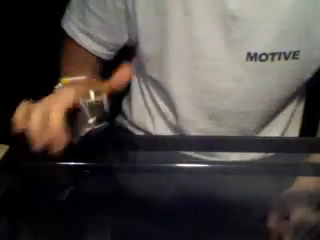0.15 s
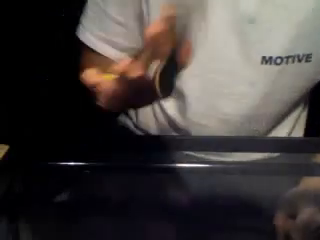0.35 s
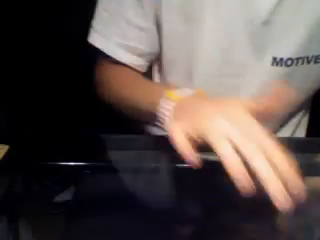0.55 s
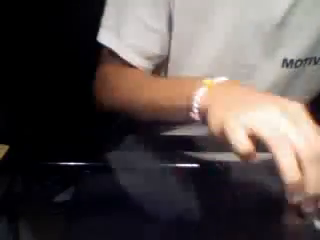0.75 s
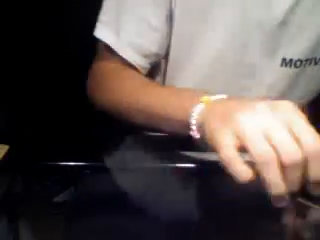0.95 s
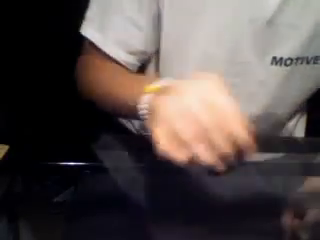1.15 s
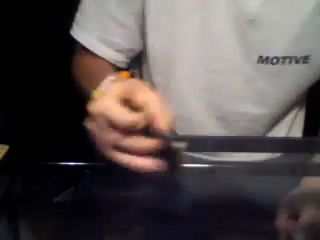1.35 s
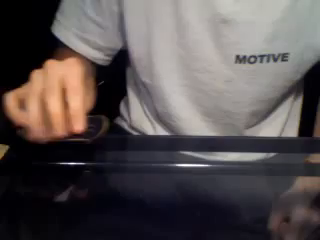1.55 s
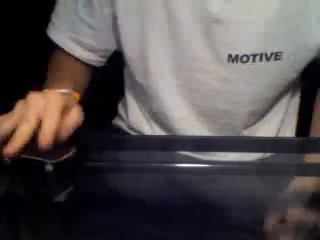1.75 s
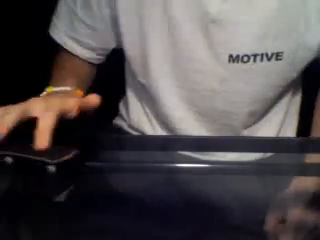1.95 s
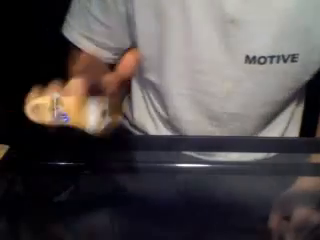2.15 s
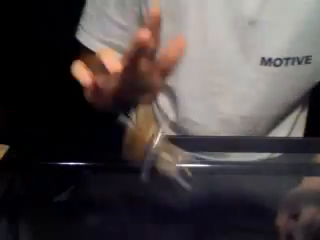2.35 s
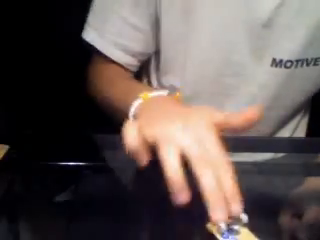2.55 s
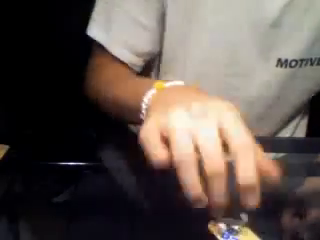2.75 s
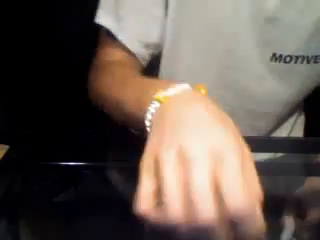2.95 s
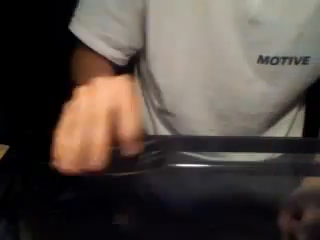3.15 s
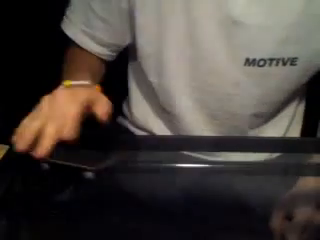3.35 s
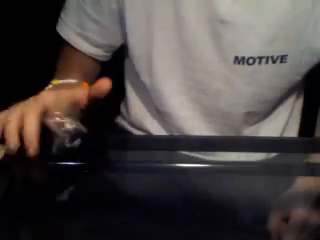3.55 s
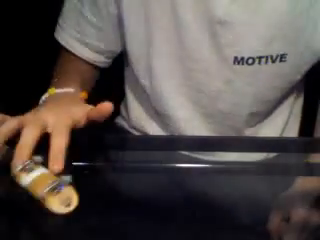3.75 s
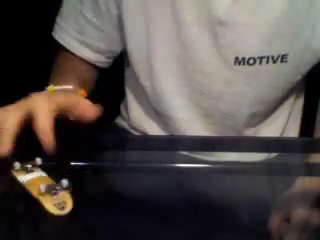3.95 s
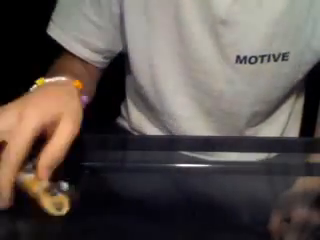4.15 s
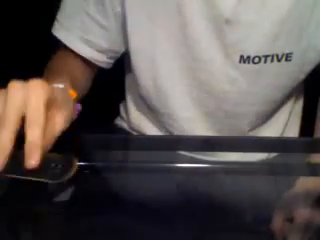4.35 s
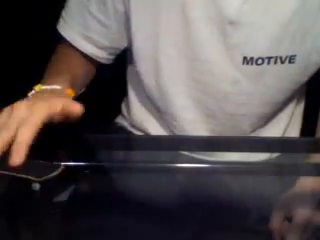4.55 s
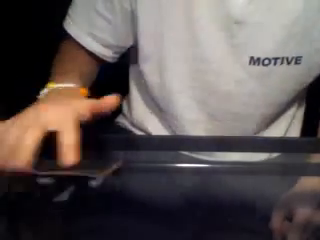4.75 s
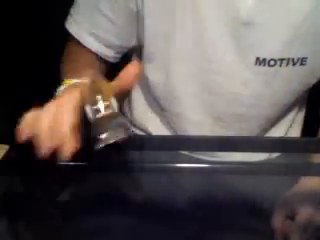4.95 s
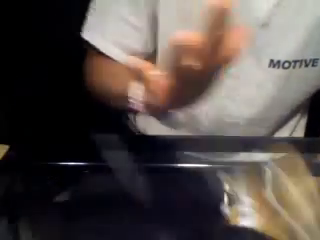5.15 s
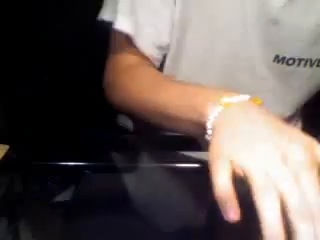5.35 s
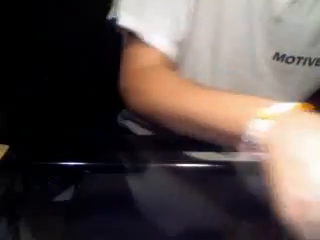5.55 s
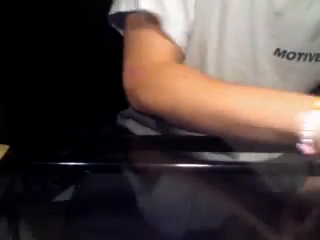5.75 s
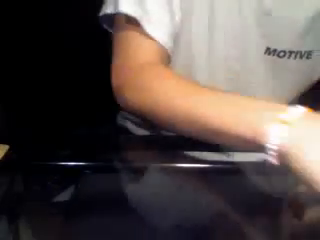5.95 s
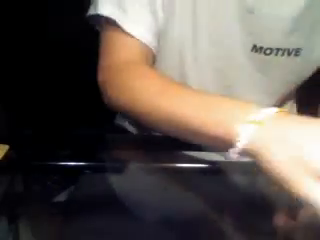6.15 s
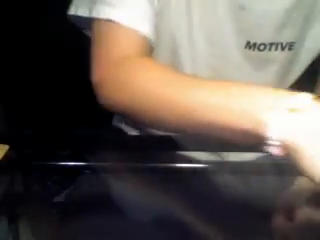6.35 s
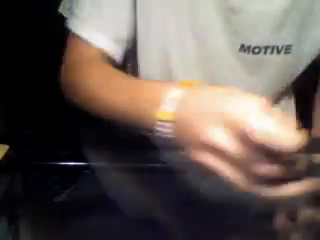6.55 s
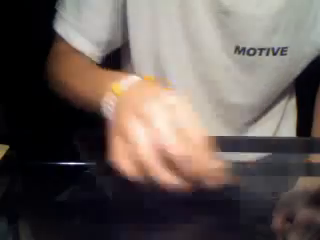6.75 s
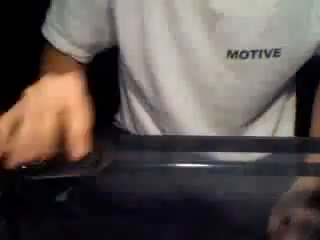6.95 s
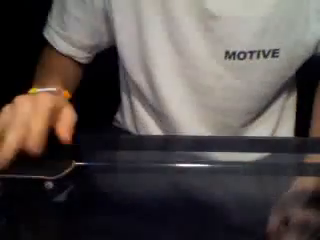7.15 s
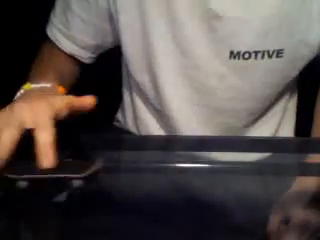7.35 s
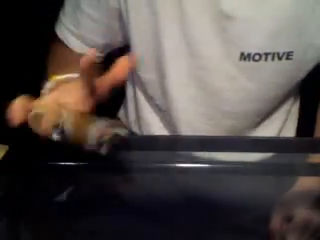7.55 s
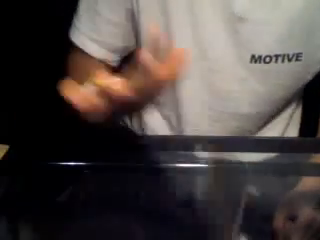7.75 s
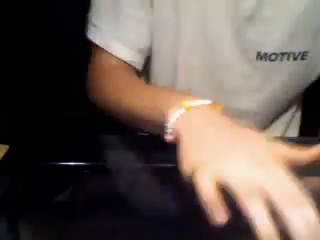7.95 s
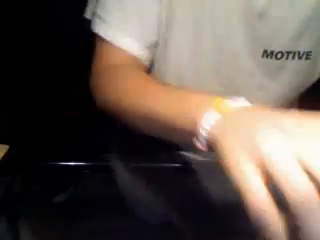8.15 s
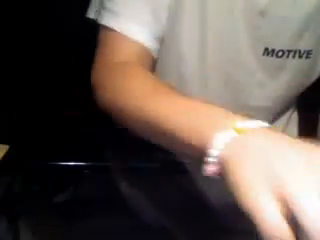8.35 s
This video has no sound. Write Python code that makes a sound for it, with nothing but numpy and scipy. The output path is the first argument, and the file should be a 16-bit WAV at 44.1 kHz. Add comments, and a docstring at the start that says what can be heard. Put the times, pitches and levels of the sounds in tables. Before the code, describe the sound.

A fingerboard does five tricks on a hard desk. Each begins with a light snap of the tail, usually after a faint roll, then a brief gap and a burst of sharp, ringing clacks as the deck and metal trucks land. The desk answers with short low hums. Lighter taps and soft hand rubs fall between tricks. It is heard close to a small microphone in a quiet room, over hiss and a thin electronic whine.

```python
"""A fingerboard clatters on a hard desk: deck and metal trucks land in bursts of ringing clacks. The tail
scuffs and is popped, the tiny wheels roll and whirr, and fingers slam the board flat. The desk answers each
blow with a short low hum, and a hand rubs softly on it. Heard close to a small microphone in a quiet room, over
hiss and a thin electronic whine."""
import sys
import numpy as np
from scipy import signal
from scipy.fft import rfft, irfft
from scipy.io import wavfile

SR = 44100
rng = np.random.default_rng(int(sys.argv[2]) if len(sys.argv) > 2 else 0)


def generate_wav(sig):
    """Save sig (samples, or channels by samples) to the path in sys.argv[1] as 16-bit PCM at SR."""
    pcm = np.round(np.clip(np.atleast_2d(sig).T, -1, 1) * 32767).astype(np.int16)
    wavfile.write(sys.argv[1], SR, pcm)


N = 369999
BLOW_S = 0.25
CONTACT_BANDS_HZ = [(500, 1800), (1800, 4500), (4500, 12000)]   # knock, clack, tick


# landings, bright on bare metal, dull on soft wheels:
# start_s, level_db, brightness_db, thump_db, rattle_t60_s, deck_hz, truck_hz
LANDINGS = [(0.5452, -22.5, -1.5, -33, 0.029, 1410, 3340), (0.565, -21.5, 1, -36, 0.046, 1250, 3360),
            (0.5859, -37, 2, -36, 0.04, 1110, 8250), (0.598, -30, 5.5, -37.5, 0.0098, 1110, 5150),
            (0.6271, -30.5, 3, -37, 0.043, 1260, 4040), (0.7792, -53, -11, -67, 0.032, 980, 2710),
            (0.9629, -35.5, -0.5, -41.5, 0.057, 1010, 4330), (1.3427, -43.5, -17.5, -57, 0.038, 1280, 2260),
            (1.4255, -26.5, -3, -42.5, 0.033, 1140, 2670), (1.4357, -30.5, -4.5, -44.5, 0.032, 1680, 2180),
            (1.6743, -39, -1, -58, 0.032, 1780, 4060), (1.705, -35.5, 1, -51.5, 0.033, 1020, 3600),
            (2.416, -23.5, 0.5, -32.5, 0.048, 720, 5350), (2.5106, -28, 7.5, -41, 0.026, 860, 8100),
            (2.5183, -29.5, 3.5, -29, 0.033, 790, 7700), (2.9694, -49, -6, -55.5, 0.034, 1360, 2750),
            (3.0007, -39, 3, -54, 0.028, 1140, 2980), (3.2055, -41.5, -2, -51.5, 0.038, 1000, 7050),
            (3.225, -44, -4, -61, 0.063, 1180, 8500), (3.2636, -35, -1.5, -57.5, .036, 760, 3900),
            (3.4337, -56.5, -12, -63, 0.052, 625, 3360), (3.729, -27, 0, -49, 0.033, 1295, 2600),
            (4.221, -53.5, -16, -74, .024, 805, 3060), (4.2515, -34, 2.5, -56.5, 0.029, 947, 7400),
            (4.3862, -43.5, -0.5, -59, 0.046, 980, 7140), (4.4385, -33, -1.5, -50, 0.028, 950, 7400),
            (4.5872, -56.5, -14, -65, 0.043, 665, 3190), (5.1542, -32, 6, -34.5, 0.012, 1120, 5700),
            (5.1751, -25.5, -0.5, -30, 0.032, 1080, 5840), (5.1859, -28.5, 5.5, -54, 0.014, 960, 5670),
            (5.247, -24.5, 0, -32, 0.034, 870, 2950), (5.261, -34.5, 1, -42.5, 0.044, 1970, 5070),
            (5.3276, -39, -2.5, -47, 0.042, 1280, 2680), (5.404, -39, -19.5, -43, 0.043, 1860, 2900),
            (5.4503, -44.5, 5.5, -51.5, 0.031, 1320, 6200), (5.5287, -43, -11.5, -50, 0.022, 1840, 2810),
            (6.3751, -48.5, -8, -57, .017, 1890, 2900), (6.4001, -38, -10, -44, 0.021, 1870, 2370),
            (6.6742, -34, -19, -43, 0.017, 1240, 3140), (6.7566, -22.5, 0.5, -39, 0.022, 835, 2750),
            (7.012, -37, -8, -55, 0.013, 1890, 2640), (7.0228, -39, 0.5, -59, 0.04, 820, 6920),
            (7.053, -36, -1.5, -52.5, 0.041, 1210, 5470), (7.7999, -26.5, -4, -38.5, 0.034, 1350, 2270),
            (7.8176, -22.5, -1, -36.5, 0.025, 1430, 3080), (7.8883, -36, 1.5, -36.5, 0.028, 910, 3200),
            (7.8997, -35.5, 2.5, -41, 0.042, 1700, 3620), (7.9704, -36, -0.5, -42, .022, 734, 6000),
            (7.9847, -39, -0.5, -55, 0.069, 1950, 8050), (8.0487, -36, -9, -49.5, 0.016, 774, 5000),
            (8.3119, -32, 0, -39, 0.049, 1390, 7240)]
# loose board bouncing edge to edge: start_s, end_s, gap_s, level_db, deck_hz
TUMBLES = [(3.755, 3.87, .029, -35.5, 800), (5.364, 5.43, .02, -40.5, 1540)]


def board_hits(tumble_loss_db=14, jitter_s=0.0015, uneven_db=1.5, knock_db=-3.5, knock_loss_per_db=0.438):
    """List the landings and fading bounces; a brighter blow has less wooden knock."""
    rows = list(LANDINGS)
    bounce_bright_db, bounce_thump_db, bounce_t60_s, bounce_truck_hz = -2.5, -8.5, 0.034, 3240
    for start, end, gap, db, deck_hz in TUMBLES:
        for s in np.arange(start, end, gap):
            late, stronger = rng.standard_normal(2)
            level = db - tumble_loss_db * (s - start) / (end - start) + uneven_db * stronger
            rows.append((s + jitter_s * late, level, bounce_bright_db, level + bounce_thump_db,
                         bounce_t60_s, deck_hz, bounce_truck_hz))
    hits = []
    for s, db, bright_db, thump_db, t60_s, deck_hz, truck_hz in rows:
        bands_db = (db + knock_db - knock_loss_per_db * bright_db, db, db + bright_db)
        hits.append((s, bands_db, thump_db, t60_s, deck_hz, truck_hz))
    return hits


# board resonances on landing: pitch_hz, width_hz, gain_db
BOARD_MODES = [(980, 64, -4), (1299, 240, -5), (1857, 75, -6), (2417, 67, -2.5), (3230, 790, 4.5),
               (4050, 135, -4), (4700, 230, -17.5), (5500, 2100, -1.5), (6420, 650, -5), (7800, 1560, -5)]


def clatter(hits, deck_width_hz=260, deck_db=4.0, truck_db=8.0):
    """The board lands and tumbles; deck and trucks ring differently with each grip and angle."""
    out = np.zeros(N)
    for s, bands_db, thump_db, t60_s, deck_hz, truck_hz in hits:
        modes = BOARD_MODES + [(deck_hz, deck_width_hz, deck_db), (truck_hz, truck_hz / 4, truck_db)]
        blow = contact(bands_db, t60_s, modes, crack_db=5.5, crack_t60_s=0.0033, dry_db=-6, grain_db=4.5)
        add(out, s, blow)
        add(out, s, desk_hum(thump_db))
    return out


def contact(bands_db, t60_s, modes, crack_db, crack_t60_s, dry_db, grain_db, uneven_db=2.0):
    """One hard crack, then loose wheels and trucks rattle; both ring the board."""
    t = times(BLOW_S / 2)
    n = len(t)
    grains = rng.standard_normal(n) * from_db(grain_db * np.repeat(rng.standard_normal(n), 20)[:n])
    build_s = 0.036 * t60_s
    rattle = grains * (1 - np.exp(-t / build_s)) * from_db(-60 * t / t60_s)
    crack = rng.standard_normal(n) * from_db(crack_db - 60 * t / crack_t60_s)
    force = rattle + crack + 1e-18
    rings = sum(from_db(db + uneven_db * rng.normal()) * resonate(force, hz, width_hz)
                for hz, width_hz, db in modes)
    sound = from_db(dry_db) * force + rings
    return sum(at_level(band(sound, *edges), db) for edges, db in zip(CONTACT_BANDS_HZ, bands_db))


def lead_ins(hits, lead_s=0.0066, gain_db=-9.0):
    """A faint hiss swells for a few milliseconds before each clack."""
    t = times(lead_s)
    out = np.zeros(N)
    for s, bands_db, *_ in hits:
        hiss = sum(from_db(db) * band_noise(len(t), *edges)
                   for edges, db in zip(CONTACT_BANDS_HZ, bands_db))
        add(out, s - lead_s, hiss * from_db(gain_db) * np.sqrt(t / lead_s))
    return out


# tail snaps: start_s, level_db, thump_db, rattle_t60_s
POPS = [(0.165, -40.5, -46, .036), (2.1282, -39.5, -43, 0.026), (3.584, -43.5, -52, 0.012),
        (4.8449, -41, -50, 0.04), (7.5154, -41.5, -46.5, 0.033)]
# board resonances in a pop: pitch_hz, width_hz, gain_db
POP_MODES = [(435, 30, 14.5), (628.5, 73, 6), (860, 74, 0.5), (1360, 310, 1), (1650, 120, -9.5),
             (3390, 390, 0.5), (6800, 450, -12), (8200, 1500, -8)]
LOOSE_POP_T60_S = 0.046


def pops(truck_hz=5950, truck_width_hz=950, wave_db=-5.0):
    """The tail snaps against the desk; a crisper snap ticks louder and rings the trucks more."""
    out = np.zeros(N)
    for s, db, thump_db, t60_s in POPS:
        crispness = np.log2(LOOSE_POP_T60_S / t60_s)
        modes = POP_MODES + [(truck_hz, truck_width_hz, 5 + 2.5 * crispness)]
        bands_db = (db - 1, db, db + 5 + 4.5 * crispness)
        snap = contact(bands_db, t60_s, modes, crack_db=8, crack_t60_s=0.0055, dry_db=-18, grain_db=8)
        add(out, s, snap)
        add(out, s, desk_hum(thump_db) + bending_wave(thump_db + wave_db))
    return out


def tail_scuffs(lead_s=0.023, rise_db=18.0, end_db=-39.0):
    """Before each pop the fingers press the tail down and it scuffs the desk, ever harder."""
    t = times(lead_s)
    out = np.zeros(N)
    for s, *_ in POPS:
        scuff = band_noise(len(t), 520, 6500)
        add(out, s - lead_s, scuff * from_db(end_db - rise_db * (1 - t / lead_s)))
    return out


def wheel_spin(t60_s=0.26):
    """Airborne wheels whirr on their axles; a looser pop leaves more whirr."""
    t = times(BLOW_S)
    whirr = np.zeros(N)
    for s, db, _, rattle_t60_s in POPS:
        looseness = np.sqrt(rattle_t60_s / LOOSE_POP_T60_S)
        add(whirr, s, looseness * rng.standard_normal(len(t)) * from_db(db - 60 * t / t60_s))
    return from_db(-5) * resonate(whirr, 5850, 550) + from_db(8) * resonate(whirr, 8800, 1300)


# fingers slam the board flat: start_s, pulse_db, contact_s
SLAMS = [(0.597, -26, 0.00018), (2.419, -17.5, 0.00014), (2.5123, -26, 0.0011), (2.516, -28, 0.00066),
         (5.2488, -21.5, 0.00017), (6.7572, -7.5, 0.00015)]


def slams(flex_hz=640, flex_t60_s=0.008, flex_db=-5.0):
    """A slam pushes one pulse out of the desk, whose top flexes briefly."""
    t = times(BLOW_S)
    flex = np.sin(2 * np.pi * flex_hz * t) * from_db(flex_db - 60 * t / flex_t60_s)
    out = np.zeros(N)
    for s, db, contact_s in SLAMS:
        pulse = (2 * t / contact_s) * np.exp(1 - 2 * t / contact_s)
        add(out, s, -from_db(db) * (pulse + flex))
    return signal.sosfilt(signal.butter(1, 30, "high", fs=SR, output="sos"), out + 1e-18)


# desk top resonances: pitch_hz, gain_db, t60_s
DESK_MODES = [(113, -25, 0.071), (162, -17.5, 0.17), (203, -13.5, 0.1384), (261, -4, 0.056),
              (299.2, 3, 0.067), (343.7, 2, 0.1), (424, -2.5, 0.08)]


def desk_hum(level_db, uneven_db=4.5, shove_db=2.5, shove_t60_s=0.02):
    """A blow shoves the desk and rings its low modes; spot and resting hand vary level and pitch."""
    t = times(BLOW_S)
    detune = 1 + 0.05 * rng.standard_normal(len(DESK_MODES))
    hum = np.zeros(len(t))
    for k, (hz, db, t60_s) in enumerate(DESK_MODES):
        decay = from_db(db + uneven_db * rng.normal() - 60 * t / t60_s)
        hum += (-1) ** k * decay * np.sin(2 * np.pi * hz * detune[k] * t)
    shove = band_noise(len(t), 25, 535) * from_db(shove_db - 60 * t / shove_t60_s)
    return at_level(hum + shove, level_db)


def bending_wave(level_db, start_hz=620, end_hz=175, glide_s=0.00894, t60_s=0.13, build_s=0.0058):
    """High bending waves cross the desk faster than low ones, so the thump falls in pitch."""
    t = times(BLOW_S)
    hz = end_hz + (start_hz - end_hz) * np.exp(-t / glide_s)
    wave = np.sin(2 * np.pi * (np.cumsum(hz) / SR + rng.random()))
    return at_level(wave * (1 - np.exp(-t / build_s)) * from_db(-60 * t / t60_s), level_db)


# pushes along the desk: start_s, end_s, level_db
ROLLS = [(0.023, 0.16, -61.5), (0.712, 0.79, -56.5), (1.916, 2.146, -60), (4.6, 4.87, -57.5),
         (7.295, 7.526, -58.5)]
# rolling noise: freq_hz, relative_density_db
WHEEL_SPECTRUM = [(200, -34), (450, -15.5), (750, 4.5), (1000, 2), (1500, -10), (3500, -6), (9000, -36)]


def rolling(attack_s=0.063, release_s=0.015, rough_db=2.5):
    """Small wheels gather speed and murmur unevenly over the desk."""
    t = np.arange(N) / SR
    push = sum(from_db(db) * np.clip((t - start) / attack_s, 0, 1) * np.clip((end - t) / release_s, 0, 1)
               for start, end, db in ROLLS)
    wobble = band_noise(N, 14, 120)
    return shaped_noise(WHEEL_SPECTRUM) * push * from_db(rough_db * wobble)


# hand and wrist on the desk: start_s, level_db, length_s
RUBS = [(0.832, -58.5, 0.11), (2.87, -55, 0.035), (4.145, -58, .05), (5.845, -52.5, 0.052),
        (6.14, -62, 0.057), (6.28, -60, .05)]


def hand_rubs(hum_hz=320, width_hz=110):
    """Dragging skin wakes the desk's low hum without a click."""
    swell = np.zeros(N)
    for s, db, length_s in RUBS:
        add(swell, s, from_db(db) * np.hanning(int(length_s * SR)))
    friction = band_noise(N, 104, 390)
    return swell * rms_one(resonate(friction, hum_hz, width_hz))


# room decay: freq_hz, t60_s
ROOM_DECAY = [(150, 0.36), (400, 0.13), (1000, 0.2), (3000, 0.28), (7000, 0.27), (11000, 0.18)]
# room reflections: freq_hz, gain_db
ROOM_GAIN = [(150, -9.5), (400, -12.5), (1000, -9), (3000, -11.5), (5500, -10), (8500, -6.5), (11000, -4.5)]


def room(x, length_s=0.5, first_echo_s=0.0045, build_s=0.0022, patterns=7, changes_per_s=45):
    """Dense reflections die away band by band; their pattern shifts as the board moves about."""
    t = times(length_s)
    onset = np.clip((t - first_echo_s) / build_s, 0, 1)
    edges_hz = np.geomspace(80, 13000, 13)
    responses = np.zeros((patterns, len(t)))
    for low, high in zip(edges_hz, edges_hz[1:]):
        hz = np.sqrt(low * high)
        fade = onset * from_db(-60 * t / at_hz(ROOM_DECAY, hz))
        echoes = band(rng.standard_normal(responses.shape), low, high)
        responses += from_db(at_hz(ROOM_GAIN, hz)) * echoes * fade / np.sqrt(np.sum(fade ** 2))
    place = np.arange(N) / SR * changes_per_s
    out = np.zeros(N)
    for k, response in enumerate(responses):
        away = np.abs((place - k) % patterns - 1)
        crossfade = np.cos(np.minimum(away, 1) * np.pi / 2)   # equal power
        out += signal.oaconvolve(x * crossfade, response)[:N]
    return out


# hiss: freq_hz, relative_density_db
HISS_SPECTRUM = [(18, -45), (30, -35.5), (272, -7.5), (578, -20), (724, -11.5), (842, -14), (1320, -8.5),
                 (1420, -8), (2350, -12), (2540, -10), (3690, -11.5), (3980, -16.5), (4290, -15.5),
                 (9110, -28.5), (12000, -50), (15600, -85), (22000, -120)]
# electronic whine: pitch_hz, rms_db
WHINE_TONES = [(1299.5, -67.5), (2600, -73), (3898, -71)]


def background(hiss_db=-57.5):
    """Steady hiss with a thin electronic whine."""
    t = np.arange(N) / SR
    whine = sum(from_db(db) * np.sqrt(2) * np.sin(2 * np.pi * (hz * t + rng.random()))
                for hz, db in WHINE_TONES)
    return from_db(hiss_db) * shaped_noise(HISS_SPECTRUM) + whine


def times(length_s):
    """Sample times in seconds."""
    return np.arange(int(length_s * SR)) / SR


def from_db(db):
    """Decibels to gain."""
    return 10 ** (np.asarray(db) / 20)


def rms_one(x):
    """Scale to rms 1."""
    return x / np.sqrt(np.mean(x ** 2) + 1e-20)


def at_level(x, db, head_s=0.014, reference_s=0.01):
    """Scale a blow so its head holds the energy of reference_s at db rms."""
    head = x[:int(head_s * SR)]
    return x * from_db(db) / np.sqrt(np.sum(head ** 2) / (reference_s * SR) + 1e-20)


def at_hz(points, hz):
    """Read a table along a log-frequency axis."""
    freqs_hz, values = np.array(points).T
    return np.interp(np.log(hz), np.log(freqs_hz), values)


def band(x, low_hz, high_hz):
    """Steep causal band-pass."""
    return signal.sosfilt(signal.butter(4, [low_hz, high_hz], "band", fs=SR, output="sos"), x)


def band_noise(n, low_hz, high_hz):
    """Band-limited noise, rms 1."""
    return rms_one(band(rng.standard_normal(n), low_hz, high_hz))


def shaped_noise(spectrum):
    """Steady noise of a given colour, rms 1."""
    hz = np.maximum(np.fft.rfftfreq(N, 1 / SR), 1)
    return rms_one(irfft(rfft(rng.standard_normal(N)) * from_db(at_hz(spectrum, hz)), N))


def resonate(x, hz, width_hz):
    """Two-pole resonance, peak gain 1."""
    r = np.exp(-np.pi * width_hz / SR)
    feedback = [1, -2 * r * np.cos(2 * np.pi * hz / SR), r * r]
    return signal.lfilter(np.array([1, 0, -1]) * (1 - r * r) / 2, feedback, x)


def add(track, start_s, sound):
    """Mix a sound in at start_s."""
    i = int(start_s * SR)
    track[i:i + len(sound)] += sound[:N - i]


def scene(desk_echo_db=-11.0):
    """Board and desk in the room, over the background."""
    hits = board_hits()
    board = clatter(hits) + lead_ins(hits) + pops() + tail_scuffs() + wheel_spin() + rolling()
    desk = slams() + hand_rubs()   # reaches the microphone mostly through the desk itself
    echoes = room(board + from_db(desk_echo_db) * desk)
    return (board + desk + echoes + background())[None]


def record(dry, roll_off_hz=10300, cutoff_hz=12500):
    """The small recorder rounds the peaks, rolls off the treble and cuts the top."""
    rounded = 0.87 * np.tanh(dry / 0.91)
    dulled = signal.sosfilt(signal.butter(10, roll_off_hz, fs=SR, output="sos"), rounded)
    return signal.sosfilt(signal.ellip(10, 0.3, 70, cutoff_hz, fs=SR, output="sos"), dulled)


dry = scene()
out = record(dry)
generate_wav(out)
```